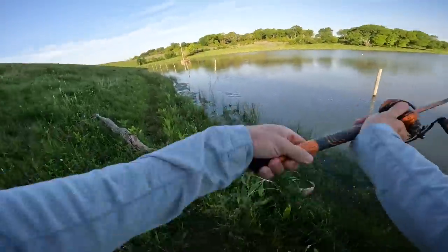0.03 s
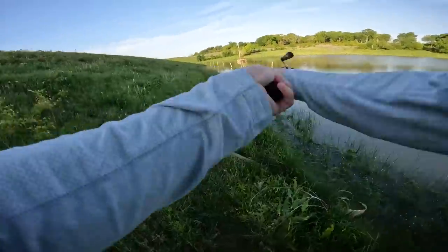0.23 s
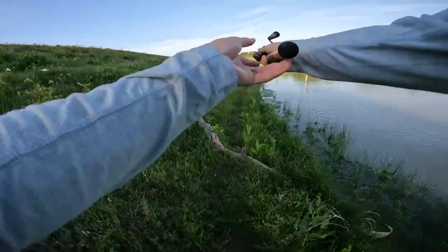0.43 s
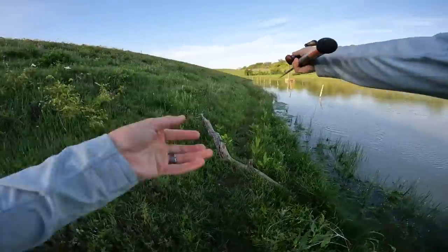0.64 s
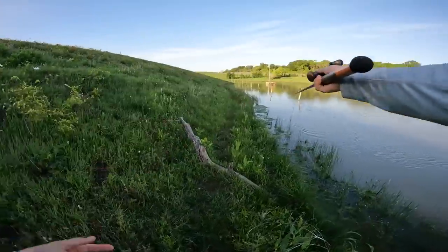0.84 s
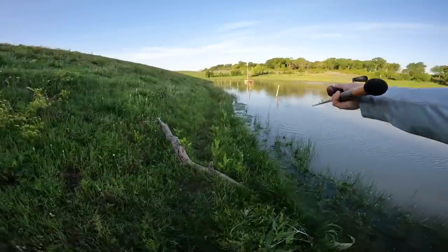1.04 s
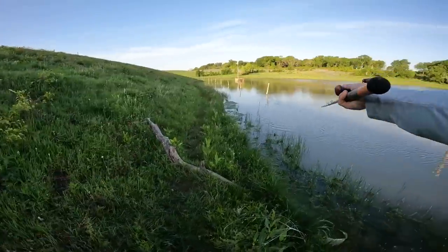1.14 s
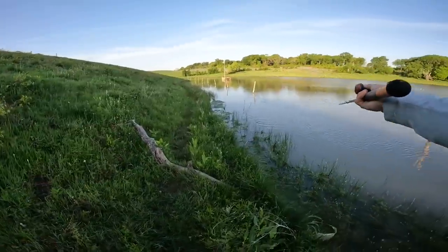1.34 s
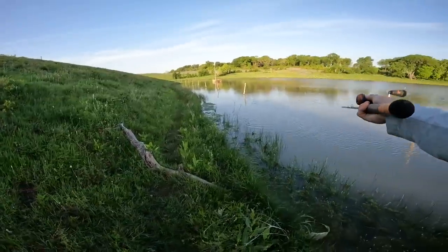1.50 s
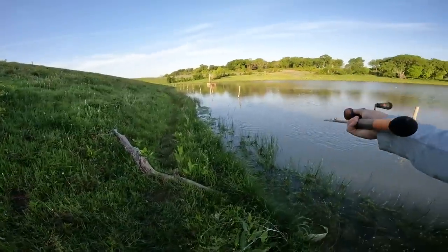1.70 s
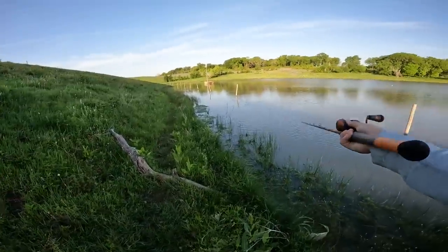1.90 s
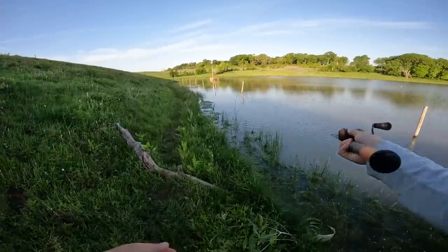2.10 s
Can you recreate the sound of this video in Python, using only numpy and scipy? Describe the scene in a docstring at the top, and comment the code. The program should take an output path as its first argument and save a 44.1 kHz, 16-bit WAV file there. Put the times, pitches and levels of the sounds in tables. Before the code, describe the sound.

A fishing reel whirs through a cast, close at the angler's chest in open pond air. A small click and sleeve rustles come first, then a low air puff near 0.25 s. Line rips off raspily at 0.3-0.45 s; a buzzing metallic whine glides down, fading by about 1.3 s. A soft thumb brush follows near 1.4 s, a sharp click at 1.7 s, then faint handling over light breeze.

```python
"""A cast with a baitcasting reel on a pond bank, heard at the angler's chest.
Throughout, shaped noise makes a light breeze and open air, and a wavering sine makes a faint far hum.
First a click, then sleeves rustle as gritty noise and the passing arm puffs air at the microphone.
Line rips off the spool as bursts of noise; the spool's harmonics whine through the reel frame and glide down.
A thumb brushes it, decaying resonances click the reel to a stop, and light touches end the scene."""
import sys
import numpy as np
from scipy import signal
from scipy.fft import rfft, irfft
from scipy.io import wavfile
from scipy.ndimage import uniform_filter1d

SR = 44100
rng = np.random.default_rng(int(sys.argv[2]) if len(sys.argv) > 2 else 0)


def generate_wav(sig):
    """Save sig (samples, or channels by samples) to the path in sys.argv[1] as 16-bit PCM at SR."""
    pcm = np.round(np.clip(np.atleast_2d(sig).T, -1, 1) * 32767).astype(np.int16)
    wavfile.write(sys.argv[1], SR, pcm)


N = 94815
T = np.arange(N) / SR

# Open air spectrum: [f/Hz, level/dB]
AIR_SPECTRUM = [(60, -3), (100, 0), (125, -7.5), (165, -3), (220, -1.5), (400, -13.5), (1000, -19.5),
                (2000, -27.5), (4300, -29.5), (5300, -39), (7200, -29.5), (9300, -44.5), (12300, -57),
                (13500, -76)]
AIR_DB, HUM_HZ, HUM_DB = -58.5, 167.3, -59.5

# Wind on the microphone: [t/s, level/dB]; its spectrum: [f/Hz, level/dB]
WIND_LEVEL = [(0, -45.5), (.15, -43.5), (.24, -38), (.4, -45), (.5, -47), (.75, -55.5), (.98, -43.5),
              (1.07, -55.5), (1.16, -45), (1.3, -54.5), (1.41, -46), (1.8, -57.5), (2.05, -50.5),
              (2.15, -47.5)]
WIND_SPECTRUM = [(15, -2.5), (28, -6), (50, -5), (100, -20), (200, -25.5), (500, -60)]
PUFF_S, PUFF_WIDTH_S, PUFF_DB = 0.2467, 0.011, -18.5

# Sleeves and hands rubbing: [t/s, length/s, level/dB, tilt/(dB per octave)]; spectrum: [f/Hz, level/dB]
RUB_EVENTS = [(0.032, 0.042, -53, 1), (.056, 0.023, -47.5, -1.5), (0.105, 0.092, -52, 1),
              (0.156, 0.053, -49, 2), (0.171, 0.0029, -40, -5.5), (0.211, 0.031, -49, -0.5),
              (0.919, 0.029, -57.5, 1), (1.42, 0.05, -60, 1.5), (1.685, 0.027, -59, 4),
              (1.89, 0.18, -57, -10), (2.027, 0.032, -62, -1.5), (2.115, 0.054, -61, -2)]
RUB_SPECTRUM = [(150, -6), (500, -6), (1000, -1), (2000, -5.5), (3800, -4.5), (5200, -14.5), (7300, -7.5),
                (9200, -20.5), (13000, -25)]

# Dull knocks of hand and thumb on rod and reel: [t/s, level/dB, decay/s]; spectrum: [f/Hz, level/dB]
KNOCK_EVENTS = [(.0575, -44, .003), (.1405, -46, .003), (.1555, -45, .003), (.266, -36.5, .002),
                (1.3752, -46, .0025), (1.3795, -44, .0035), (1.3865, -49.5, .005), (1.754, -50.5, .0025),
                (2.1045, -55, .003)]
KNOCK_SPECTRUM = [(200, -6), (1300, -4), (2200, -1.5), (3700, 0), (5000, -16), (7500, -12), (12000, -34)]

# Thin ticks, slack line against the reel, then fingers on the grip: [t/s, f/Hz, level/dB]
TICK_EVENTS = [(1.328, 10400, -55), (1.335, 10300, -56), (1.343, 9900, -56), (1.367, 10100, -58),
               (1.767, 3200, -58), (1.774, 2800, -57), (1.787, 2900, -59), (1.812, 7400, -60),
               (1.815, 2900, -61), (1.971, 2900, -61)]
TICK_S, TICK_WIDTH_HZ = 0.0016, 1900

# Gliding rushes of sleeve, rod, thumb and sliding line:
# [start t/s, length/s, first f/Hz, last f/Hz, width/Hz, level/dB]
SWISH_EVENTS = [(.14, .042, 1150, 947, 390, -53), (.178, .063, 556, 419, 250, -56),
                (.175, .057, 6720, 5500, 900, -57.5), (.266, .045, 1100, 1432, 614, -50),
                (.3, .0406, 1489, 2054, 900, -41), (.318, .035, 260, 330, 220, -46),
                (.28, .07, 8500, 6600, 1410, -48), (.364, .032, 2770, 2890, 700, -42),
                (1.199, .19, 11600, 11300, 700, -73), (1.385, .045, 930, 915, 250, -60),
                (1.418, .011, 1600, 1560, 600, -54), (1.372, .2, 7700, 6000, 1100, -66.5),
                (1.52, .06, 6100, 5800, 1500, -62)]

# Clicks of the reel: [t/s, level/dB, tilt/(dB per octave)]
CLICK_EVENTS = [(0.0113, -41, 6), (1.6756, -36, 0), (1.698, -46.5, 8)]
# Ringing modes of the reel: [f/Hz, relative level/dB, t60/s]
REEL_MODES = [(1360, -11, 0.0078), (3020, -0.5, 0.0089), (3920, 2.5, 0.0043), (7100, -3, 0.0042),
              (7650, 4.5, 0.0044), (11200, -22, 0.00067)]

# Hiss of the running line: [t/s, level/dB]; its spectrum: [f/Hz, level/dB]
HISS_LEVEL = [(.27, -110), (.32, -43), (.38, -47.5), (.41, -51), (.5, -58), (.62, -52.5), (.8, -56),
              (.92, -56.5), (1.0, -59), (1.2, -61), (1.36, -64.5), (1.45, -64), (1.64, -64.5), (1.7, -110)]
HISS_SPECTRUM = [(300, -53), (900, -6), (2000, -2), (2800, -6.5), (3700, 4.5), (4500, -5), (5200, -20),
                 (6500, -3), (7800, -5.5), (9200, -12.5), (13000, -13.5)]
# Line ripping off during the swing: [t/s, low rush level/dB, bright rasp level/dB]
RIP_LEVELS = [(.252, -57.5, -82), (.282, -44, -73), (.304, -42, -70), (.32, -36, -47), (.343, -40, -44.5),
              (.361, -39, -45.5), (.381, -42.5, -38), (.396, -45, -48), (.442, -50.5, -49.5),
              (.49, -54, -59), (.8, -105, -105)]
# Spectra of rush and rasp: [f/Hz, level/dB]
RUSH_SPECTRUM = [(90, -7), (170, 5.5), (300, -1), (500, 0.5), (800, -0.5), (2100, -1), (2900, -4),
                 (3900, -5), (5200, -9.5), (7600, -7), (12000, -49)]
RASP_SPECTRUM = [(800, -14), (2200, -12), (2900, -3), (4200, 20), (5500, 16), (7800, -11), (9500, -39),
                 (12500, -29), (15000, -7)]
TURN_DEPTH = .45  # swing of the hiss amplitude over one turn

# Spool speed: [t/s, turn rate f/Hz]
SPOOL_SPEED = [(.27, 150), (.33, 490), (.40, 503), (.44, 501), (.485, 508), (.52, 498), (.595, 461),
               (.635, 453), (.68, 428), (.765, 395), (.81, 397), (.885, 355), (.94, 349), (1.0, 336),
               (1.06, 316), (1.16, 294), (1.24, 273), (1.67, 195)]
# Strength of the whine: [t/s, level/dB]
WHINE_LEVEL = [(.285, -99), (.335, -52), (.45, -48.5), (.55, -49), (.625, -46.5), (.7, -50), (.81, -51),
               (.88, -55), (.97, -56.5), (1.115, -62.5), (1.305, -71), (1.405, -81), (1.63, -75),
               (1.7, -109)]
# Resonances of the reel frame: [f/Hz, relative level/dB]
FRAME_RESPONSE = [(310, -33), (920, -21), (1550, -17), (1800, -10), (1930, -2), (2040, -6), (2280, -15),
                  (2530, -5), (2750, -14), (3030, -9), (3200, -11), (3380, -3), (3600, 4.5), (3830, -.5),
                  (4040, 0), (4520, -5), (4850, -17), (5200, -31), (6150, -15), (7050, -14), (8150, -22),
                  (9350, -42), (12100, -44)]
# Multiples of the turn that stand out: {multiple: relative level/dB}
STRONG_MULTIPLES = {4: 3, 6: -2, 7: -1.5, 8: 1.5, 9: 1, 10: 1, 14: 4, 15: 4, 19: 3, 24: 12, 36: 7}
# Bearing tones: place above each multiple (in turn rates) and relative level
CAGE_RATIO, CAGE_DB = .61, -14
# Spread of each tone's level, of the relative speed, and of the spool angle
FLUTTER_DB, SPEED_JITTER, WOBBLE_RAD = 2.4, .0012, .02

# Left over right level, and size of the side signal against the middle
REEL_PAN_DB, WIND_PAN_DB, WHINE_PAN_DB = -2, -7, -3
WHINE_WIDTH, HISS_WIDTH = .25, .38

# Treble roll-off of the microphone: [f/Hz, level/dB]
MIC_RESPONSE = [(11500, 0), (12800, -1), (13600, -11), (15500, -20)]
TREBLE_EACH_SIDE_DB, TOP_HZ = 2.5, 15600


def amp(db):
    """Level to amplitude: 20 dB is a factor of ten."""
    return 10 ** (np.asarray(db) / 20)


def unit(x):
    """Normalisation to rms 1."""
    return x / np.sqrt(np.mean(x ** 2))


def curve(rows, axis=1):
    """Linear interpolation of one table column in time."""
    rows = np.array(rows)
    return np.interp(T, rows[:, 0], rows[:, axis])


def response(points, hz):
    """Transfer gain: dB values interpolated along a logarithmic frequency axis."""
    points = np.array(points)
    return amp(np.interp(np.log(hz + 1), np.log(points[:, 0]), points[:, 1]))


def colour(x, points, tilt=0):
    """Linear filtering by a spectrum, tilted in dB per octave above 200 Hz; rms 1."""
    hz = np.arange(N // 2 + 1) * SR / N
    octaves = np.log2(np.maximum(hz, 200) / 1000)
    spectrum = rfft(x) * response(points, hz) * amp(tilt * octaves)
    return unit(irfft(spectrum, N))


def walk(rate):
    """Random modulation: held noise, drawn at the rate in Hz and smoothed twice; rms 1."""
    k = max(int(SR / rate), 2)
    held = np.repeat(rng.standard_normal(N // k + 1), k)
    smooth = uniform_filter1d(uniform_filter1d(held, k), k)
    return unit(smooth[:N])


def grit(grain_db=0):
    """Amplitude modulation: independent mid and side noises share the same tiny bursts."""
    return rng.standard_normal((2, N)) * amp(grain_db * walk(900))


def band(hz, width_hz):
    """Quadrature modulation: low-passed mid and side noises moved to a centre frequency; rms 1."""
    phase = 2 * np.pi * np.cumsum(hz * np.ones(N)) / SR
    low = signal.butter(3, min(width_hz / 2, SR / 4), fs=SR, output="sos")
    a, b = signal.sosfilt(low, rng.standard_normal((2, 2, N)))
    return unit(a * np.sin(phase) + b * np.cos(phase))


def place(pair, pan_db, width):
    """Sum and difference stereo: mid and side signals become left and right."""
    sign = np.array([[1], [-1]])
    return (pair[0] + width * sign * pair[1]) * amp(sign * pan_db / 2)


def pond():
    """Broadband ambience, and a far hum with random frequency and amplitude modulation."""
    air = colour(grit(), AIR_SPECTRUM) * amp(AIR_DB + 0.43 * walk(10.25))
    hum_hz = HUM_HZ * (1 + 0.02225 * walk(24.73))
    phase = 2 * np.pi * np.cumsum(hum_hz) / SR
    hum = amp(HUM_DB + 2.4 * walk(5.2)) * np.sin(phase)
    return place(air, -.8, 0.44) + hum


def wind():
    """Pressure fluctuation: a breeze buffets the microphone and the passing arm gives one soft puff."""
    u = (T - PUFF_S) / PUFF_WIDTH_S
    puff = amp(PUFF_DB) * u * np.exp((1 - u ** 2) / 2)  # a trough, then an equal crest
    breeze = colour(grit(), WIND_SPECTRUM) * amp(curve(WIND_LEVEL))
    return place([puff, 0 * puff], WIND_PAN_DB, 0) + place(breeze, -1.1, 0.2)


def rubs():
    """Friction noise: short gritty swells of cloth and skin against rod and reel."""
    out = 0
    for at, length, db, tilt in RUB_EVENTS:
        swell = np.exp(-2 * ((T - at) / length) ** 2)
        out = out + colour(grit(2.45), RUB_SPECTRUM, tilt) * amp(db) * swell
    return place(out, -1.6, 0.35)


def knocks():
    """Damped impact: a sudden noise burst in the reel's body decays within milliseconds."""
    out = 0
    for at, db, decay_s in KNOCK_EVENTS:
        decay = (T >= at) * np.exp(-np.maximum(T - at, 0) / decay_s)
        out = out + colour(grit(), KNOCK_SPECTRUM) * amp(db) * decay
    return place(out, REEL_PAN_DB, HISS_WIDTH)


def ticks():
    """Light contact: each touch is a burst of a few milliseconds around its own pitch."""
    out = 0
    for at, hz, db in TICK_EVENTS:
        burst = np.exp(-((T - at) / TICK_S) ** 2)
        out = out + band(hz, TICK_WIDTH_HZ) * amp(db) * burst
    return place(out, -0.6, 0.22)


def swishes():
    """Gliding band noise: each rush swells and fades while its centre frequency moves."""
    out = 0
    for start, length, first_hz, last_hz, width_hz, db in SWISH_EVENTS:
        along = np.clip((T - start) / length, 0, 1)
        centre_hz = first_hz + (last_hz - first_hz) * along
        rush = band(centre_hz, width_hz)
        level = amp(db + 1.4 * walk(300))
        out = out + rush * level * np.sin(np.pi * along)
    return place(out, -2.1, 0.12)


def clicks():
    """Modal excitation: each click rings the reel's modes, which decay exponentially."""
    out = np.zeros((2, N))
    for at, db, tilt in CLICK_EVENTS:
        age = np.maximum(T - at, 0)
        sizes = np.array([amp(mode_db + tilt * np.log2(hz)) for hz, mode_db, _ in REEL_MODES])
        sizes = sizes / np.linalg.norm(sizes)
        for size, (hz, _, t60) in zip(sizes, REEL_MODES):
            detune = 1 + 0.01 * rng.standard_normal((2, 1))
            decay = np.exp(-np.log(1000) * np.minimum(age / t60, 10))
            out += amp(db) * size * np.sin(2 * np.pi * hz * detune * age) * decay
    return place(out, .8, 0)


def line(turns):
    """Friction noise: line hisses off the spool, pulsing once a turn; the swing rips it off roughly."""
    pulse = 1 + TURN_DEPTH * np.cos(2 * np.pi * turns)
    hiss = colour(grit(0.54) * pulse, HISS_SPECTRUM) * amp(curve(HISS_LEVEL))
    rush = colour(grit(1.1), RUSH_SPECTRUM, tilt=-0.76) * amp(curve(RIP_LEVELS))
    rasp = colour(grit(2.8), RASP_SPECTRUM) * amp(curve(RIP_LEVELS, axis=2))
    return place(hiss + rush + rasp, REEL_PAN_DB, HISS_WIDTH)


def whine(hz, turns):
    """Source and filter: turn harmonics and weaker bearing tones slide through the frame's resonances."""
    out = np.zeros((2, N))
    wobble = WOBBLE_RAD * walk(150)
    angle = 2 * np.pi * turns + wobble
    for k in range(1, 40):
        harmonic = (k, STRONG_MULTIPLES.get(k, 0))
        bearing = (k + CAGE_RATIO, CAGE_DB)
        for multiple, db in (harmonic, bearing):
            phase = multiple * angle + 2 * np.pi * rng.random((2, 1))
            level = amp(db + FLUTTER_DB * walk(22))
            out += response(FRAME_RESPONSE, multiple * hz) * level * np.sin(phase)
    spinning = (T > .4) & (T < 1.3)
    spinning_rms = np.sqrt(np.mean(out[:, spinning] ** 2))
    return place(out * amp(curve(WHINE_LEVEL)) / spinning_rms, WHINE_PAN_DB, WHINE_WIDTH)


def scene():
    """Superposition of reel, angler and pond; one spool rotation drives both whine and line."""
    hz = curve(SPOOL_SPEED) * (1 + SPEED_JITTER * walk(52.54))
    turns = np.cumsum(hz) / SR
    cast = whine(hz, turns) + line(turns)
    touches = rubs() + knocks() + clicks() + swishes() + ticks()
    background = wind() + pond()
    return cast + touches + background


def record(dry):
    """Transducer response: two ports differ in phase and top treble; roll-off and a steep cut follow."""
    hz = np.arange(N // 2 + 1) * SR / N
    top = np.clip((hz - 6000) / 7000, 0, 1)
    sign = np.array([[1], [-1]])
    phase_rad = np.minimum(hz / 2500, 1) * 0.24 + 0.13 * top  # opposite sign in each port
    ports = amp(sign * top * TREBLE_EACH_SIDE_DB) * np.exp(-1j * sign * phase_rad)
    heard = irfft(rfft(dry) * ports * response(MIC_RESPONSE, hz), N)
    cut = signal.ellip(8, .2, 70, TOP_HZ, fs=SR, output="sos")
    return signal.sosfilt(cut, heard)


dry = scene()
out = record(dry)
generate_wav(out)
```